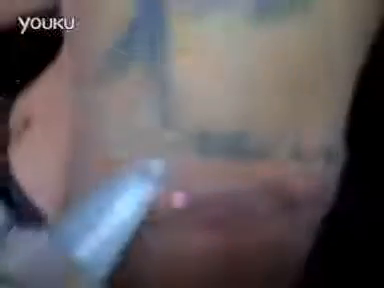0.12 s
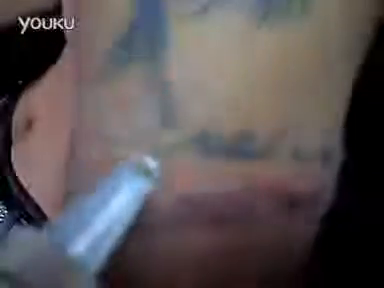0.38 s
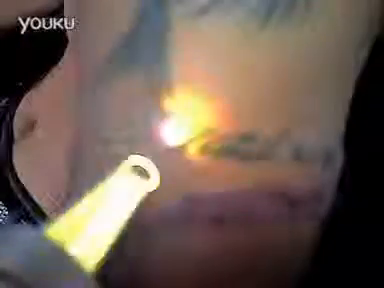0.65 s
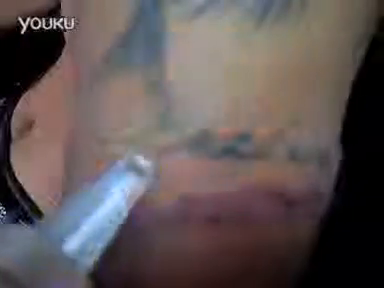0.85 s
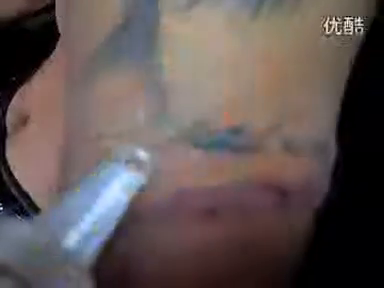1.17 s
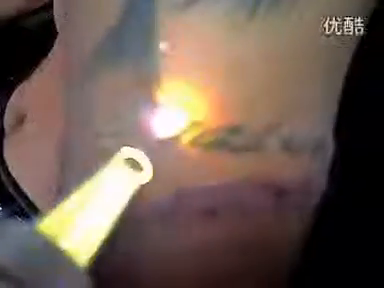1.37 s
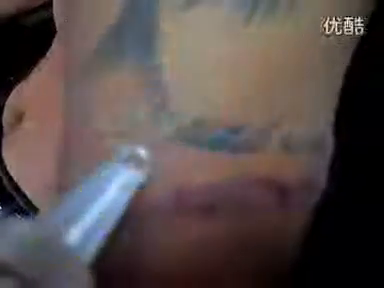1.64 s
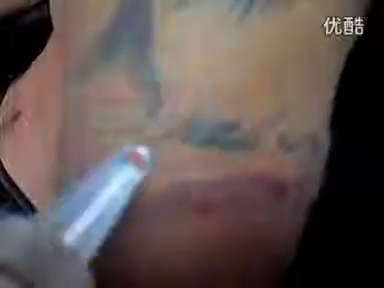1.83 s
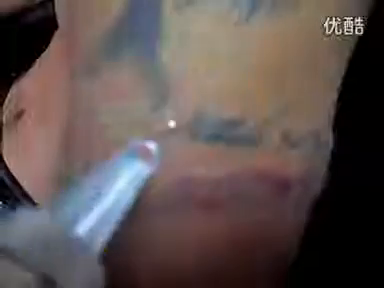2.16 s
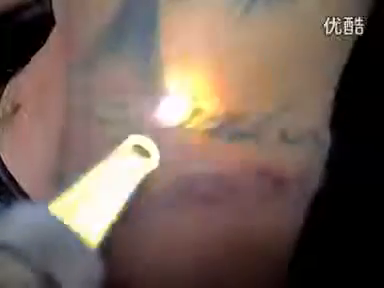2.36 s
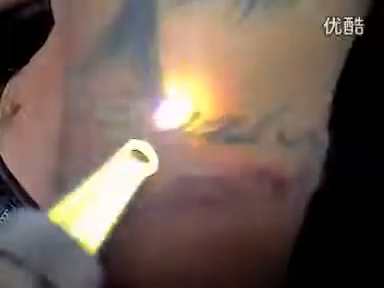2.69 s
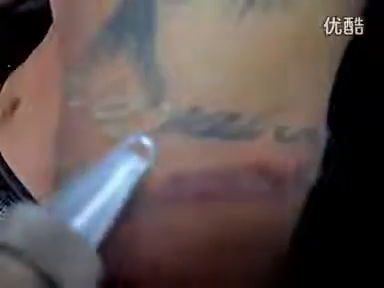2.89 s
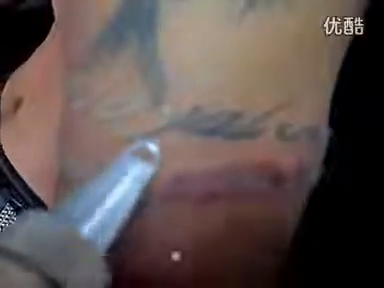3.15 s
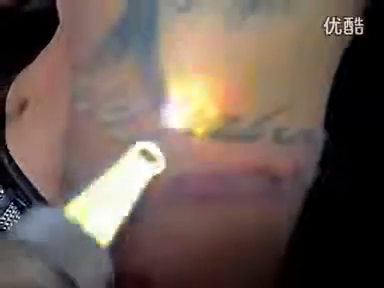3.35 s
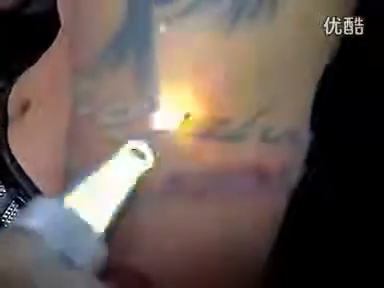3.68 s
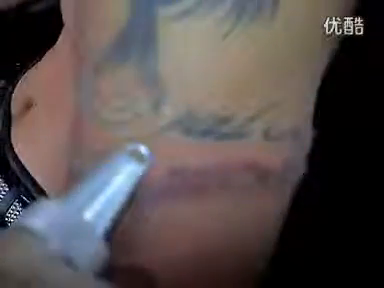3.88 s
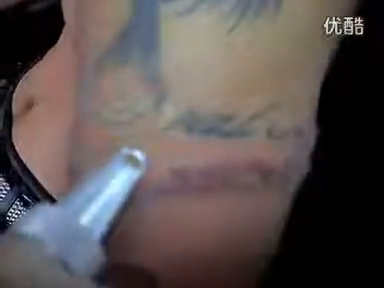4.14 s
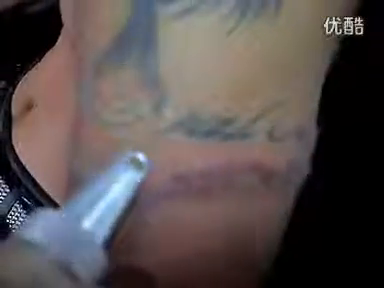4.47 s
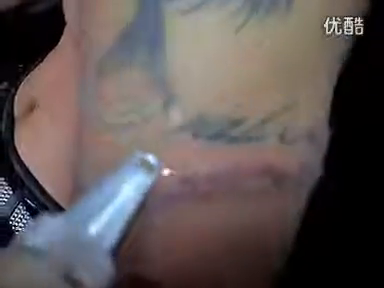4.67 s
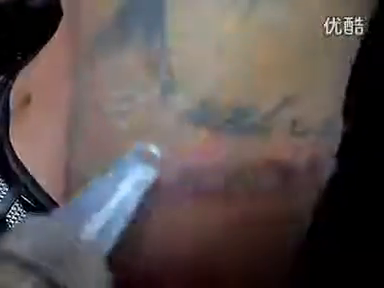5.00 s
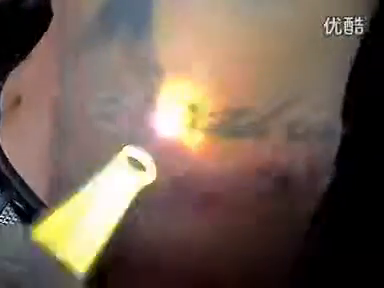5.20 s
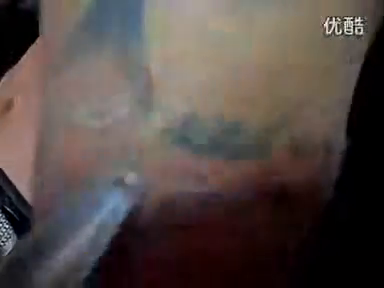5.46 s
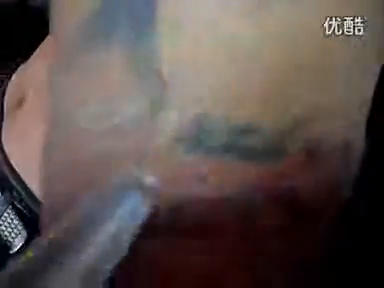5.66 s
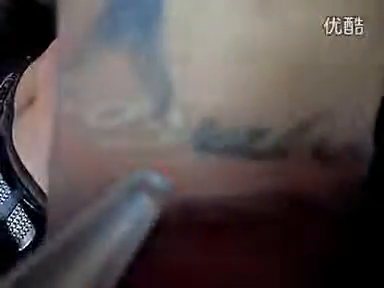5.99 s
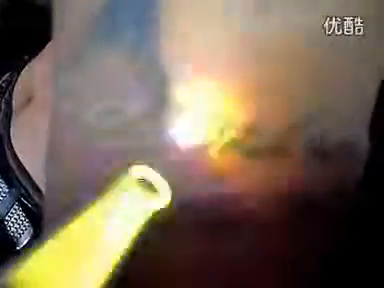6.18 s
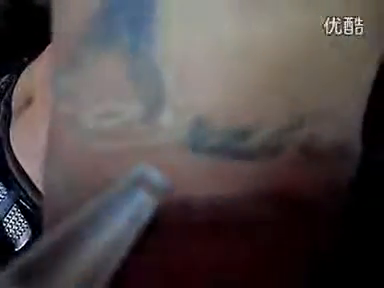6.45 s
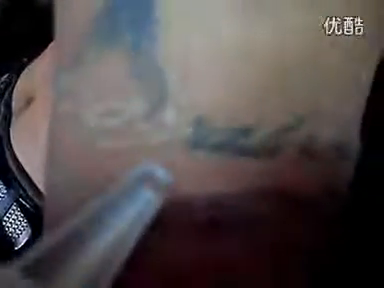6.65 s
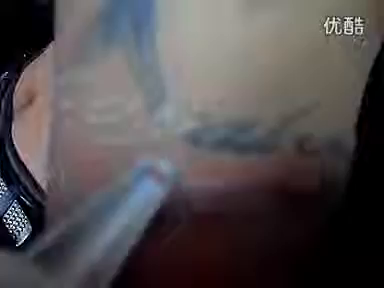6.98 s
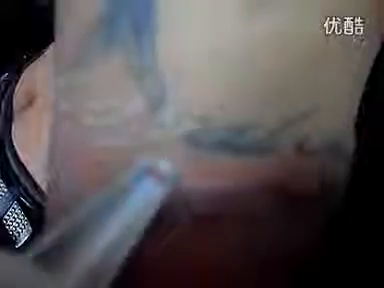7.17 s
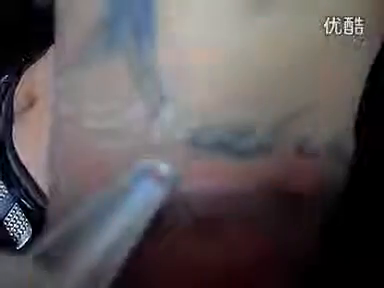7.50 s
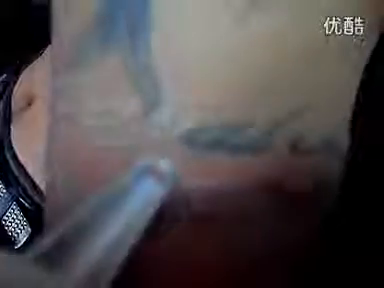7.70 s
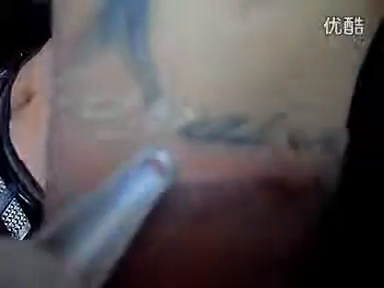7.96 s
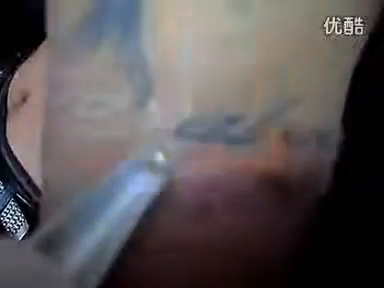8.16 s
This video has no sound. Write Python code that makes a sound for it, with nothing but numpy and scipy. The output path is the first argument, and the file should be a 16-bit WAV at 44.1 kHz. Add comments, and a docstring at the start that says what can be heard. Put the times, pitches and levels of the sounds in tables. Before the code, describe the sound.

Rapid, evenly spaced cracks from a tattoo removal laser, heard close up, with a steady hum and soft fan noise underneath.

```python
"""A treatment room, where a tattoo laser fires about six shots a second at an arm.
Each flash bursts on the ink with a bright crack and a low puff of vapour, and the room rings after it.
The laser cabinet clacks with each discharge, over a bed of hum, cooling fan and pump rumble.
It is all heard from a small camera close by, which overloads on the snaps."""
import sys
import numpy as np
from scipy import signal
from scipy.fft import rfft, irfft, next_fast_len
from scipy.io import wavfile
from scipy.ndimage import uniform_filter1d, map_coordinates

SR = 44100
rng = np.random.default_rng(int(sys.argv[2]) if len(sys.argv) > 2 else 0)


def output_pcm(signal):
    """Save a mono or channel-first signal as 16-bit PCM at the path in sys.argv[1].

    Samples are clipped to [-1, 1] before scaling.
    """
    pcm = np.clip(np.atleast_2d(signal).T, -1, 1) * 32767
    wavfile.write(sys.argv[1], SR, np.round(pcm).astype(np.int16))


N = 367353

# The machine's hum. Each row: pitch in Hz, average level in dB.
HUM_TONES = [(100.1, -38), (200, -61.5), (336, -60.5), (400, -70), (450, -57.5), (481, -59.5), (673, -58),
             (1143, -68.5)]
# Colours of fan and pump. Each row: frequency in Hz, relative level in dB.
FAN_COLOUR = [(20, 10), (60, 5), (130, 1.5), (230, 5), (380, 0.5), (680, -1.5), (1000, -6.5), (1400, -5.5),
              (3200, -10), (5200, -14.5), (7500, -21), (10000, -23), (13000, -47)]
PUMP_COLOUR = [(10, -27), (21, -18), (26, -12), (29, 0), (34, -25), (43, -15), (58, -24), (72, -30),
               (130, -35.5), (400, -100)]
# The pump's level ride. Each row: time in seconds, level in dB before trim and swells.
PUMP_RIDE = [(.8, -43.5), (2.1, -38), (2.7, -45), (3.3, -41), (4.15, -36.5), (5.4, -38), (6.55, -30.5),
             (7.1, -39.5), (8.3, -35)]
# The ring that sounds with each discharge: the cabinet's modes, plus two higher rings at 4830 and 9650 Hz. Each
# row: pitch in Hz, relative level in dB, seconds to fade by 60 dB.
CABINET_MODES = [(1662, -5, .14), (1702, -8, .15), (1780, -8, .14), (1842, -1, .2), (1999, -5, .11),
                 (2618, -13, .1), (3051, -10, .1), (3414, -9, .08), (3630, -9, .1), (5303, -5, .1),
                 (6824, -8, .1), (4830, -4, .1), (9650, -4, .1)]
# Colour of the reverb. Each row: frequency in Hz, relative level in dB.
REVERB_COLOUR = [(100, -1), (450, -14.5), (900, 3), (1350, -0.5), (1900, 2), (3300, 3), (4200, 1),
                 (5250, 6.5), (5700, 3), (7700, 2), (10000, 1.5), (10700, -2.5), (13000, 3)]
# Length of the reverb. Each row: frequency in Hz, seconds to fade by 60 dB.
REVERB_DECAY = [(200, 0.7), (1500, 0.35), (4000, 0.51), (10000, 0.47)]
# Slaps off near surfaces. Each row: delay in seconds, level in dB against the crack.
EARLY_ECHOES = [(.0062, -27), (.0126, -24), (.0141, -21), (.0275, -28)]
# Resonances between skin and handpiece, for three positions of the hand.
# Each row: centre in Hz, width in Hz, relative level in dB.
GAP_FIRST = [(872, 583, -9.6), (1959, 595, -4.4), (3272, 895, -5.7), (3694, 243, -4.0), (4728, 429, 0.2),
             (5201, 226, -2.1), (5820, 560, -1.8), (6592, 786, 1.8), (7000, 542, -5.1), (7559, 256, -4.1),
             (7931, 291, -2.5), (8433, 724, -1.9), (9012, 245, -5.1), (9509, 541, -1.0), (10047, 331, -4.4),
             (10600, 900, -10)]
GAP_SECOND = [(943, 575, -8.5), (1936, 541, -4.0), (2790, 1100, -10.5), (3600, 787, -4.1), (4781, 802, 0.2),
              (5383, 218, -0.2), (5806, 484, -2.0), (6547, 927, -1.2), (6907, 291, -1.7), (7198, 228, 0.4),
              (7581, 384, -0.8), (8050, 1100, -3.0), (8526, 984, -3.2), (9407, 572, 0.8),
              (10100, 1100, -10.9)]
GAP_THIRD = [(816, 903, -10.8), (1821, 484, -3.1), (2550, 650, -8.5), (3366, 518, -7.6), (4020, 400, -7),
             (4490, 620, 0.2), (5360, 330, 4.3), (5801, 307, -1.6), (6500, 800, 0.7), (6853, 278, -1.8),
             (7123, 373, -2.1), (7513, 749, -0.9), (8063, 645, -1.8), (8885, 607, -4.7), (9327, 315, 0.5),
             (9998, 1100, -3.3)]
# The hand's travel. Each row: time in seconds, position from 0 (first) to 2 (third).
HAND_PATH = [(3.5, 0), (3.9, 1), (5.4, 1), (5.9, 2)]
# Bounces between skin, handpiece and camera. Each row: round trip in seconds, reflection from 0 to 1.
GAP_BOUNCES = [(.00041, .65), (.00066, .7)]
# Ordinary bursts follow the ink under the beam. Each row: time in seconds, strength in dB.
INK_STRENGTH = [(1.3, -11), (2.1, -10), (2.6, -7.5), (3.7, -9.5), (4.1, -11), (4.6, -10.5), (6.4, -9),
                (7.1, -8), (8.2, -6.5)]
# Extra hard or soft shots. Each row: time in seconds, strength in dB, relative puff level in dB.
ACCENTS = [(.91, -9, -14), (1.76, -8, -22), (2.27, -5.5, -38), (2.78, -19.5, -31), (4.3, -15, -24),
           (4.81, -3, -32), (4.98, -2, -35), (5.15, -3.5, -16), (5.31, -16.5, -14), (6.16, -14.5, -18),
           (7.35, 1, -6.5), (7.69, -1, -5.5), (8.02, -5.5, -14)]
# Weight of the snap's low mids as the hand moves. Each row: time in seconds, boost in dB.
BODY_RIDE = [(1.1, 1.5), (3.4, .5), (4.3, -1), (5.8, -2), (7.2, -2), (8.2, 1)]
# The vapour puff grows as the work goes on. Each row: time in seconds, relative level in dB.
PUFF_RIDE = [(2.5, -30), (6.2, -21)]
# The camera's dull top octave. Each row: frequency in Hz, gain in dB.
CAMERA_EQ = [(10, 0), (10000, 0), (10400, -1.5), (11000, -8), (11700, -15), (13000, -28), (14500, -60)]

FIRST_SHOT_S, PERIOD_S = .7461, .16925  # the laser fires on a strict clock
SHOT_TIMES = np.arange(FIRST_SHOT_S, N / SR, PERIOD_S)


def amp(db):
    return 10 ** (np.asarray(db) / 20)


def along(points, hz):
    """Read a frequency curve on a log axis."""
    f, v = np.transpose(points)
    return np.interp(np.log(hz + 1), np.log(f), v)


def ride(points, s):
    """Read an automation curve at time s."""
    return np.interp(s, *np.transpose(points))


def wobble(rate):
    """A smooth random curve, rate knots a second."""
    return map_coordinates(rng.standard_normal(int(N * rate / SR) + 4), [np.arange(N) * rate / SR])


def filtered(x, response):
    """EQ x with a gain that is a function of frequency."""
    m = next_fast_len(x.shape[-1] + SR // 10)
    return irfft(rfft(x, m) * response(np.fft.rfftfreq(m, 1 / SR)), m)[..., :x.shape[-1]]


def noise(colour):
    """Coloured noise of rms 1."""
    x = filtered(rng.standard_normal(N), lambda hz: amp(along(colour, hz)))
    return x / np.sqrt(np.mean(x ** 2))


def causal(gain):
    """The tightest causal response that has this gain."""
    cepstrum = irfft(np.log(np.maximum(gain, 1e-6)))
    half = len(cepstrum) // 2
    return np.exp(rfft(cepstrum * np.r_[1, np.full(half - 1, 2), np.zeros(half)]))


def add(track, s, sound):
    """Mix a sound into the track at time s."""
    part = track[..., round(s * SR):][..., :sound.shape[-1]]
    part += sound[..., :part.shape[-1]]


def burst(t, t60):
    """Dying noise of energy 1."""
    x = rng.standard_normal(len(t)) * amp(-60 * t / t60)
    return x / np.linalg.norm(x)


def hum():
    """Mains hum and motor tones: the higher they lie, the more they drift."""
    t = np.arange(N) / SR
    tones = sum(amp(db) * np.sqrt(2) * np.sin(2 * np.pi * hz * (t + 1e-6 * hz * wobble(2.5)))
                for hz, db in HUM_TONES)
    return amp(1.3 * wobble(2.8)) * tones


def fan(level_db=-42, flutter_db=1.06):
    """The cooling fan: a soft rush of air with a slight flutter."""
    return amp(level_db + flutter_db * wobble(13)) * noise(FAN_COLOUR)


def pump(trim_db=.5, swell_db=.5):
    """The pump's deep rumble, evened out and then ridden up and down."""
    rumble = noise(PUMP_COLOUR)
    envelope = np.sqrt(np.abs(uniform_filter1d(rumble ** 2, size=SR // 5)))
    level_db = ride(PUMP_RIDE, np.arange(N) / SR) + trim_db + swell_db * wobble(6)
    return amp(level_db) * rumble / envelope


def cabinet(level_db=-35.5, delay_s=.006):
    """Each discharge knocks the cabinet about equally hard; the clack arrives from farther away."""
    out, t = np.zeros(N), np.arange(SR // 6) / SR
    hz, db, t60 = np.transpose(CABINET_MODES)[:, :, None]
    attack = 1 - np.exp(-t / .00052)
    modes = amp(db - 60 * t / t60) * np.exp(2j * np.pi * hz * t) * attack
    for s in SHOT_TIMES:
        strengths = amp(rng.normal(0, 2, len(hz)))
        phases = np.exp(2j * np.pi * rng.random(len(hz)))
        add(out, s + delay_s, amp(level_db) * ((strengths * phases) @ modes).real)
    return out


def room_tail(width_db=-12, size=256):
    """The room's diffuse ring, fresh each time: centred, with some width in the treble."""
    hz, t, grains = signal.stft(rng.standard_normal((2, SR // 2)), SR, nperseg=size)
    fade = amp(along(REVERB_COLOUR, hz)[:, None] - 60 * t / along(REVERB_DECAY, hz)[:, None])
    attack = 1 - np.exp(-t / .00051)
    mid, side = signal.istft(grains * fade * attack, SR, nperseg=size)[1]
    side = amp(width_db) * filtered(side, lambda f: f ** 6 / (f ** 6 + 3700 ** 6))
    return np.array([mid + side, mid - side]) / np.linalg.norm(mid)


def vapour_puff(t, push_s=.00089, attack_s=.00091):
    """A low thump: the vapour pushes the air out once and lets it fall back."""
    puff = (1 - t / push_s) * np.exp(-t / push_s) * (1 - np.exp(-t / attack_s))
    return puff / np.linalg.norm(puff)


def snap(s, strength_db, body_db, size=2048):
    """One burst on the skin: a shock coloured by the gap under the handpiece, drawn out by bounces."""
    hz = np.fft.rfftfreq(size, 1 / SR)
    position = ride(HAND_PATH, s)
    gap_power = 0
    for k, gap in enumerate([GAP_FIRST, GAP_SECOND, GAP_THIRD]):
        crossfade = max(0, 1 - abs(position - k))
        gap_power += crossfade * sum(amp(db) ** 2 / (1 + (2 * (hz - centre) / width) ** 2) ** 2.5
                                     for centre, width, db in gap)
    fizz = amp(-6) * (hz / 11000) ** 12 / (1 + (hz / 11000) ** 12)
    body = amp(body_db / (1 + (hz / 2800) ** 4)) * (hz + 5) / (hz + 100)
    level = amp(25.5 + .51 * strength_db)  # grows about half as fast in dB as the reverb
    shock = causal(level * np.sqrt(gap_power + fizz ** 2) * body)
    for trip_s, reflection in GAP_BOUNCES:
        echo = np.exp(-2j * np.pi * hz * trip_s)
        shock = shock * (echo - reflection) / (1 - reflection * echo)  # all-pass smear
    return irfft(shock)[:size // 2]


def shots(strength_scatter_db=.67, puff_scatter_db=3.5, body_growth=.36):
    """The cue list: the ink sets each shot's strength, and harder bursts are fuller."""
    chance = rng.standard_normal((len(SHOT_TIMES), 2))
    ordinary_db = ride(INK_STRENGTH, SHOT_TIMES)
    strength_db = ordinary_db + strength_scatter_db * chance[:, 0]
    puff_db = ride(PUFF_RIDE, SHOT_TIMES) + puff_scatter_db * chance[:, 1]
    for s, accent_db, accent_puff_db in ACCENTS:
        nearest = np.argmin(np.abs(SHOT_TIMES - s))
        strength_db[nearest], puff_db[nearest] = accent_db, accent_puff_db
    body_db = ride(BODY_RIDE, SHOT_TIMES) + body_growth * np.maximum(strength_db - ordinary_db, 0)
    return zip(SHOT_TIMES, strength_db, body_db, puff_db)


def laser(tick_lead_s=.0028, tick_db=3):
    """Every shot: a faint lead-in tick, the snap, a puff of vapour, near echoes and the room."""
    out, t = np.zeros((2, N)), np.arange(SR // 25) / SR
    for s, strength_db, body_db, puff_db in shots():
        tick = filtered(burst(t[:SR // 300], t60=.06), lambda hz: hz ** 6 / (hz ** 6 + 4600 ** 6))
        add(out, s - tick_lead_s, amp(tick_db) * tick)
        crack = snap(s, strength_db, body_db)
        add(out, s, crack)
        add(out, s + .00297, amp(puff_db + 5.5) * vapour_puff(t))
        for delay_s, db in EARLY_ECHOES:
            add(out, s + delay_s + rng.normal(0, .00023), amp(db + rng.normal(0, 1, (2, 1))) * crack)
        # clutter around the arm scatters the first milliseconds
        add(out, s + .002, amp(-18.5) * signal.fftconvolve(crack, burst(t, t60=.045)))
        add(out, s, amp(12 + strength_db) * room_tail())
    return out


def scene():
    """The laser up front, the cabinet behind it, the machine's drone underneath."""
    return laser() + cabinet() + hum() + fan() + pump()


def record(dry, ceiling=2.6, start_s=.793, top_hz=17000):
    """The microphone overloads; the camera dulls the top octave; then the loudest peaks clip hard, spraying
    thin treble. Silent until start_s."""
    squashed = dry / (1 + np.abs(dry / ceiling) ** 4) ** (1 / 4)
    dull = filtered(squashed, lambda hz: amp(along(CAMERA_EQ, hz)))
    gate = np.arange(N) > start_s * SR
    return filtered(np.clip(dull * gate, -1, 1), lambda hz: 1 / (1 + (hz / top_hz) ** 80))


dry = scene()
out = record(dry)
output_pcm(out)
```